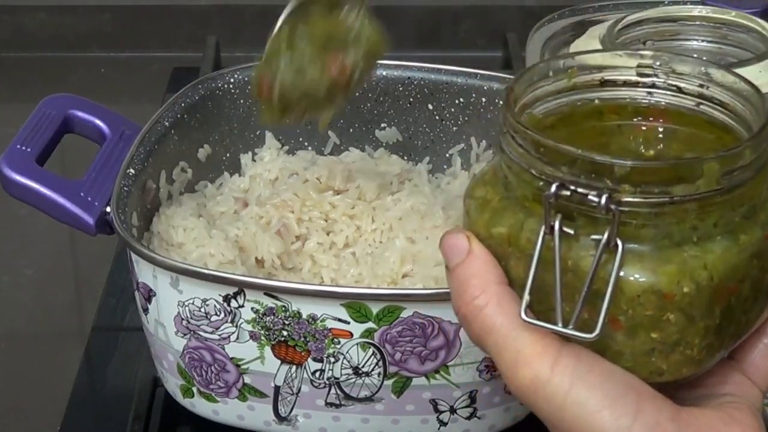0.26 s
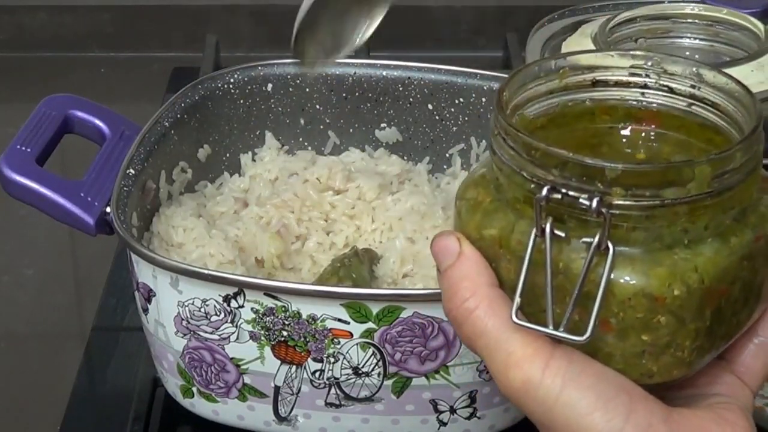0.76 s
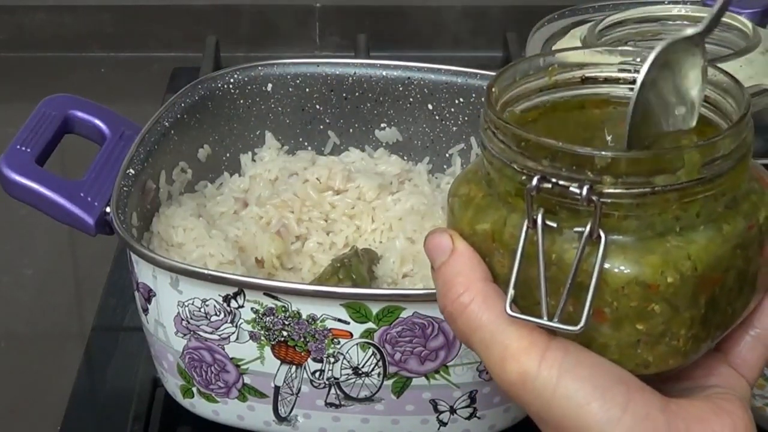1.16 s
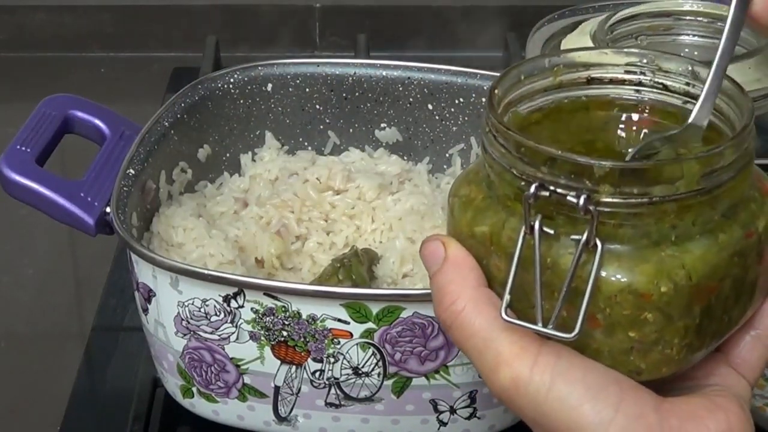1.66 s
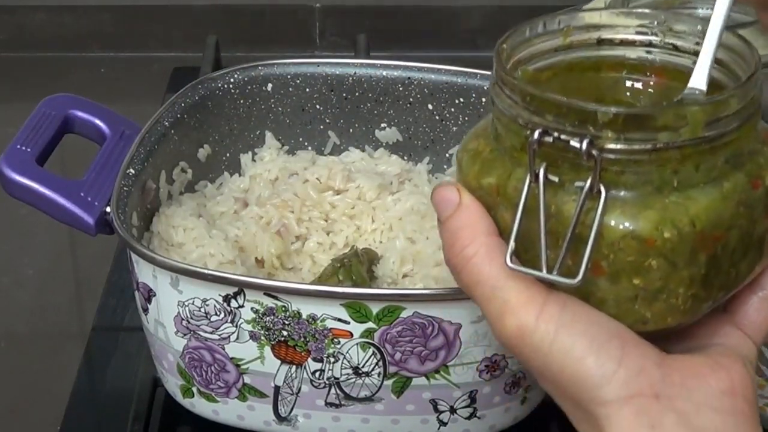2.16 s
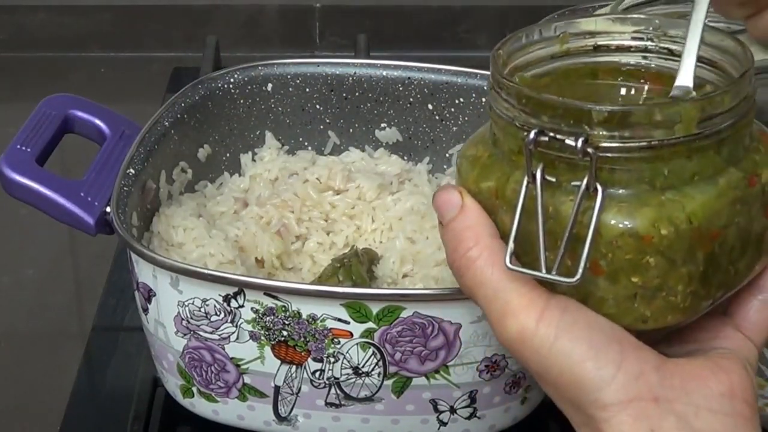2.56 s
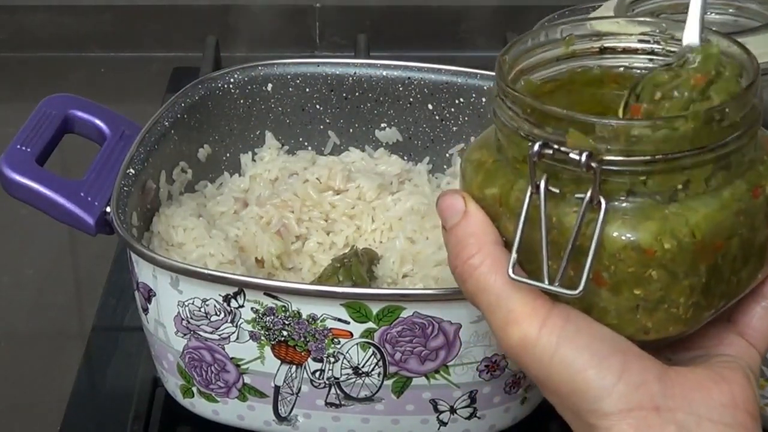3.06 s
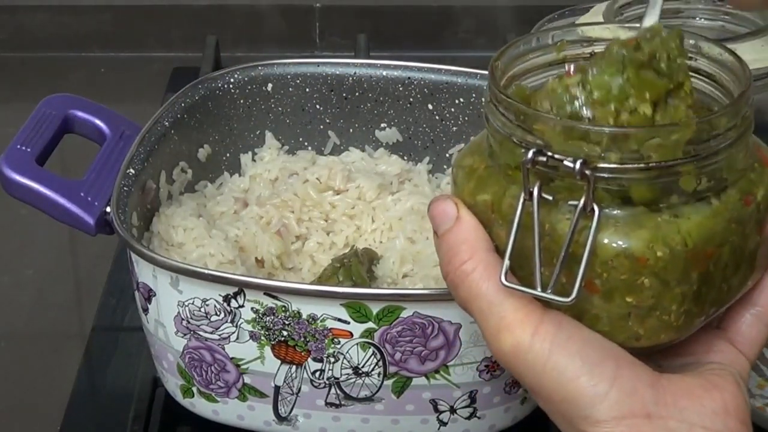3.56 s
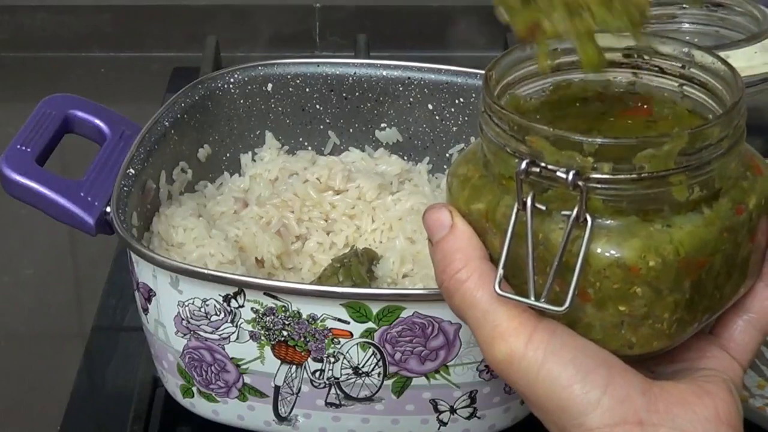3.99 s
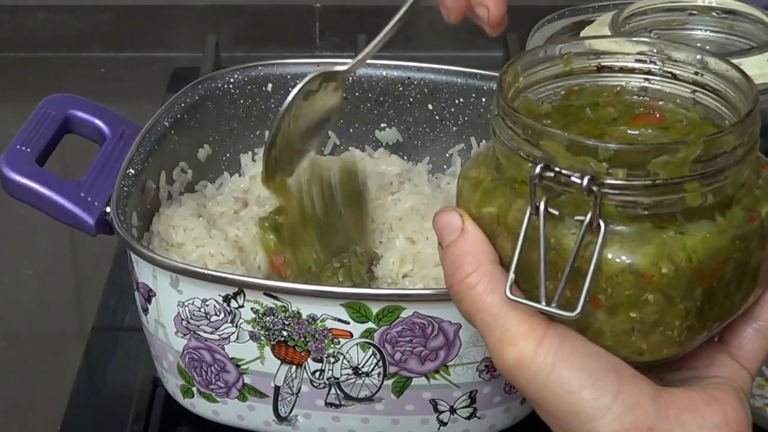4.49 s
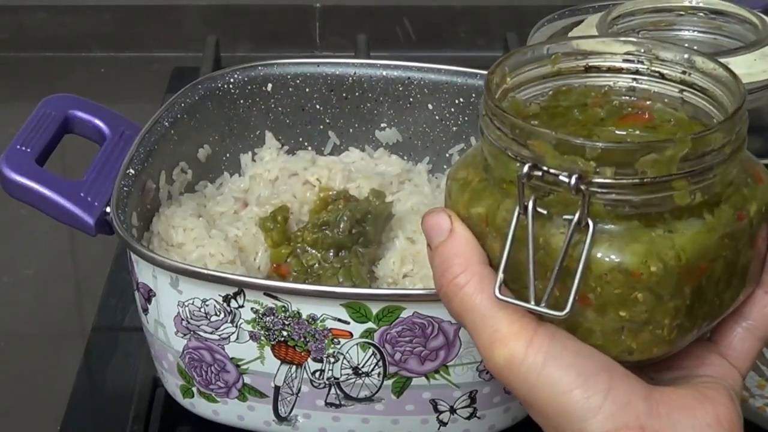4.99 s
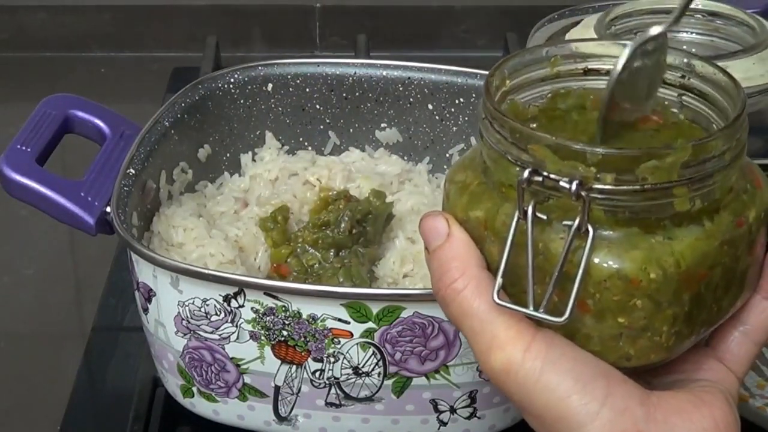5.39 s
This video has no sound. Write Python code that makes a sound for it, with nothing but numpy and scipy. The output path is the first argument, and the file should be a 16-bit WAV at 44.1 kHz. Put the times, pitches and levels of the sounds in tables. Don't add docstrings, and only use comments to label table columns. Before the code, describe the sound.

Close kitchen frying fizzes continuously, with light utensil taps and distant soft knocks, before a metal spoon hits a full jar twice around five seconds.

```python
import sys
import numpy as np
from scipy import signal
from scipy.fft import rfft, irfft
from scipy.io import wavfile
from scipy.ndimage import uniform_filter1d

SR = 44100
rng = np.random.default_rng(int(sys.argv[2]) if len(sys.argv) > 2 else 0)


def makeup_ratio(level_db):
    decades = np.asarray(level_db, float) / 20
    return 10 ** decades


def unload_audio(sound):
    columns = np.transpose(np.atleast_2d(sound))
    steps = np.round(np.clip(columns, -1, 1) * 32767)
    wavfile.write(sys.argv[1], SR, steps.astype(np.int16))


N = 248724
TIME = np.arange(N) / SR

# start [s], fizz level [dB], lean towards larger bubbles [dB].
FRYING = [(0.0, -33.5, -1), (0.3, -35.5, -1.8), (0.6, -34, 1), (0.87, -36, -3.5), (1.12, -36, -0.5),
          (1.3, -32, -0.2), (1.9, -33, -1.5), (2.05, -34, 1.5), (2.25, -33.5, 2.2), (2.75, -35.5, -0.5),
          (3.05, -34.5, 1), (3.95, -34.5, 0), (4.4, -35, -0.5), (4.9, -35, -1), (5.15, -31, 0.5),
          (5.4, -33.5, -5), (5.64, -35, -3.5)]
# centre [Hz], width [Hz], lift [dB].
KITCHEN_MODES = [(200, 25, 6.5), (258, 8.7, 1), (284, 14, 7), (330, 28, 10), (381.6, 37, 4),
                 (705, 90, -1.5), (930, 41, -10.5)]

ROOM_T60_S = 0.29


def unit(x):
    return x / np.sqrt(np.mean(x ** 2))


def walk(rate_hz):
    hold = int(SR / rate_hz)
    levels = np.repeat(rng.standard_normal(N // hold + 1), hold)
    slewed = uniform_filter1d(uniform_filter1d(levels, hold), hold)
    return unit(slewed[:N])


def colour(x, spectrum, modes):
    hz = np.fft.rfftfreq(N, 1 / SR) + 1
    point_hz, point_db = np.transpose(spectrum)
    gain_db = np.interp(np.log(hz), np.log(point_hz), point_db)
    for mode_hz, width_hz, lift_db in modes:
        gain_db = gain_db + lift_db / (1 + (2 * (hz - mode_hz) / width_hz) ** 2)
    return irfft(rfft(x) * makeup_ratio(gain_db), N)


def band(x, hz, width_hz):
    return signal.lfilter(*signal.iirpeak(min(hz, .45 * SR), hz / width_hz, fs=SR), x)


def curve(table):
    s, *columns = np.transpose(table)
    return [np.interp(TIME, s, column) for column in columns]


def rings(rows, rise_s):
    out, t = np.zeros(N + SR), TIME[:SR // 2]
    push = np.sin(np.pi / 2 * np.minimum(t / rise_s, 1)) ** 2
    for s, peak_db, hz, t60_s in rows:
        ring = makeup_ratio(peak_db - 60 * t / t60_s) * np.sin(2 * np.pi * hz * t)
        out[int(s * SR):][:len(t)] += ring * push
    return out[:N]


def room(x, t60_s, wet_db):
    # frequency [Hz], level [dB].
    capsule_difference = [(40, -29), (110, -13), (200, -12), (380, -12), (700, -5.5), (1290, -11),
                          (2380, -11.5), (4400, -8), (8100, -12), (11000, -13), (13000, -16)]
    t = TIME[:int(SR * .6)]
    tails = rng.standard_normal((2, len(t))) * makeup_ratio(-60 * t / t60_s) * (t > .002)
    tails = tails / np.sqrt(np.sum(tails ** 2, axis=1, keepdims=True))
    wet, side = signal.fftconvolve(x[None], tails, axes=1)[:, :N]
    side = colour(side, capsule_difference, [])
    return x + makeup_ratio(wet_db) * wet + side * np.array([[1], [-1]])


def bubbles(low_hz, drift_db, per_s, scatter_db, surge_db, own_db, surge_hz):
    out = 0
    surge = surge_db * walk(surge_hz) + surge_db * walk(6 * surge_hz)
    for k, drift in enumerate(drift_db):
        hz = low_hz * 2 ** (k / 3)
        strength = makeup_ratio(scatter_db * np.minimum(rng.exponential(size=N), 6))
        bursts = (rng.random(N) < per_s / SR) * rng.standard_normal(N) * strength
        ring = unit(band(band(bursts, hz, hz / 4), hz, hz / 4))
        out = out + makeup_ratio(surge + drift + own_db * walk(25.3)) * ring * np.sqrt(hz)
    return out


def vigour():
    # start [s], lift [dB].
    flares = np.array([(.04, 1), (.43, 0), (.52, -1), (.89, 4), (1.67, 1.5), (2.81, -0.5), (3.1, 2),
                       (3.42, -1), (4.04, 0), (4.22, -1), (4.25, 2), (4.45, 2.5), (4.5, -1), (4.58, 0.5),
                       (4.7, 1), (5.12, -2), (5.25, 2), (5.43, 2.5)])
    rise_s, fall_s = 0.0066, 0.22
    age = np.maximum(TIME - flares[:, :1], 0)
    lift_db = flares[:, 1:] * np.minimum(age / rise_s, 1) * np.exp(-age / fall_s)
    return curve(FRYING)[0] + lift_db.sum(axis=0)


def pan():
    # frequency [Hz], level [dB per Hz].
    fizz_colour = [(2500, -11), (4000, -12), (4700, -17), (5900, -7), (7500, -2), (8000, -3.5), (9200, 1.5),
                   (9600, -2.5), (11200, -2.5), (12200, -13), (13600, -10), (14000, -15.5), (15700, -19)]
    # frequency [Hz], level [dB per Hz].
    under_colour = [(290, -35), (500, -6), (886, -9.5), (1130, -4), (1450, -7), (1920, -4.5), (2420, -4.5),
                    (4680, -8.5), (5500, -3), (7150, -3.5), (12100, -120)]
    # centre [Hz], width [Hz], lift [dB].
    lid_modes = [(1140, 216, 4), (1614, 128, 10.5), (1920, 240, 2), (1996, 210, 6), (3010, 230, 3),
                 (3270, 13, 9), (4180, 41, 7), (6770, 110, 3), (6910, 60, 6), (8590, 80, 1), (7950, 105, 5),
                 (8300, 160, 6), (8640, 130, 4.5), (8900, 120, 5.5)]
    # t60 [s], level [dB].
    lid_echo = (.25, -14)
    large_follows, fine_follows, under_follows = 1, 0.67, 0.18
    under_db = -44

    fizz_db = vigour()
    change_db = fizz_db - fizz_db.mean()
    large_db = (large_follows - 1) * change_db + curve(FRYING)[1]
    fine_db = (fine_follows - 1) * change_db
    sizes_db = [large_db, large_db, large_db, 0, 0, fine_db, fine_db]
    fizz = bubbles(3927, sizes_db, per_s=20000, scatter_db=2.1, surge_db=0.55, own_db=.65, surge_hz=18)
    under = bubbles(560, [0] * 11, per_s=5000, scatter_db=1.8, surge_db=.5, own_db=.6, surge_hz=14)
    fizz = unit(colour(fizz, fizz_colour, lid_modes)) * makeup_ratio(fizz_db + 0.47)
    under = unit(colour(under, under_colour, lid_modes)) * makeup_ratio(under_db + under_follows * change_db)
    return room(fizz, *lid_echo) + room(under, 0.12, -8)


def appliances():
    # frequency [Hz], level [dB per Hz].
    flame_colour = [(88, -42), (150, -8.5), (232, -13), (269, -1.5), (328, -6), (422, -5.5), (544, -6),
                    (593, -7), (1200, -7.5), (1560, -34), (2640, -120)]
    # frequency [Hz], level [dB per Hz].
    deep_colour = [(15, -28), (26, -6), (38, -12), (48, -1), (60, -3.5), (85, -8), (130, -2), (170, -11.5),
                   (230, -5.5), (400, -45)]
    # start [s], hum level [dB].
    fridge_load = [
        (0.0, -73),
        (0.28, -67),
        (1.93, -65.5),
        (2.05, -81),
        (2.68, -78),
        (2.87, -67),
        (3.64, -71),
        (5.64, -69.5),
    ]
    flame_db, deep_db, deep_swell_db, fridge_hz = -51, -64, 4.5, 93.5
    deep_follows = .3

    flutter_db = .7 * walk(14) + .6 * walk(3)
    flame = unit(colour(rng.standard_normal(N), flame_colour, KITCHEN_MODES)) * makeup_ratio(flame_db + flutter_db)
    load_db = curve(fridge_load)[0]
    deep_db = deep_db + deep_follows * (load_db - load_db.mean()) + deep_swell_db * walk(2.63)
    deep = unit(colour(rng.standard_normal(N), deep_colour, [])) * makeup_ratio(deep_db)
    hum_hz, waver_db = fridge_hz * (1 + .008 * walk(4)), 1.2 * walk(5)
    hum = np.sqrt(2) * makeup_ratio(load_db + waver_db + 1.5) * np.sin(2 * np.pi * np.cumsum(hum_hz) / SR)
    return flame + deep + hum


def ticks():
    # start [s], peak [dB], ring [Hz], upper mode [Hz], upper mode minus ring [dB].
    contacts = [(0.2108, -36, 2100, 4100, -15), (0.278, -29, 1980, 3850, -1), (0.6397, -37, 1920, 2860, 7),
                (0.8803, -27, 1760, 2950, -30), (0.995, -22.5, 1690, 3010, -22),
                (1.1412, -31, 1150, 3270, 1), (1.29, -29, 2000, 3200, -1), (1.819, -26.5, 1920, 2400, 1.5),
                (2.0163, -29.5, 1790, 3660, -8), (2.0952, -22.5, 1700, 3160, -25),
                (2.3305, -28, 2080, 3700, -5), (2.4247, -32, 2130, 3440, 1), (2.4727, -30, 1900, 3680, -7),
                (2.908, -32, 1600, 2240, -5), (3.1086, -27, 2060, 3010, -6), (3.1957, -28, 1910, 1110, -1),
                (4.248, -28.5, 1640, 3750, -13), (4.547, -24, 1830, 2120, -5), (4.681, -34, 900, 1400, 1),
                (0.299, -33, 3300, 4340, 0), (3.23, -31, 1630, 3300, -4)]
    # start [s], peak
    # [dB], frequency [Hz].
    spits = [(0.052, -21, 8040), (0.1685, -19, 7940), (0.4344, -21, 9100), (0.522, -18, 9100),
             (1.29, -31, 4300), (2.8185, -19, 8600), (3.107, -27, 8490), (3.197, -24, 6400),
             (3.5209, -25, 9830), (4.2203, -21, 8300), (4.2495, -17, 8700), (5.441, -20, 8400)]
    ring_t60_s, upper_t60_s, spit_t60_s = 0.016, 0.014, 0.01
    light = [(s, peak_db - 0.5, hz, ring_t60_s) for s, peak_db, hz, _, _ in contacts]
    light += [(s, peak_db + upper_db, hz, upper_t60_s) for s, peak_db, _, hz, upper_db in contacts]
    spitting = [(*row, spit_t60_s) for row in spits]
    return rings(light, rise_s=.0015) + rings(spitting, rise_s=.0004)


def knocks():
    # start [s], peak [dB], lowest [Hz], highest [Hz], tail t60 [s].
    blows = [(0.201, -44, 151, 231, 0.9), (.2, -35.5, 396, 4470, 0.82), (.893, -32, 198, 705, 0.36),
             (.99, -39, 216, 350, 0.18), (2.094, -41.5, 218, 413, 0.93), (2.096, -32, 400, 2000, .08),
             (2.339, -38.5, 258, 406, 0.19), (2.335, -50, 1780, 2300, .3), (2.875, -39, 1480, 1740, 0.34),
             (5.426, -37, 1400, 3200, 0.47), (3.07, -42, 449, 3480, 0.97), (3.129, -37, 254, 372, 0.18),
             (4.023, -32.5, 503, 1140, 0.43), (4.061, -35.5, 486, 1020, 0.65),
             (4.027, -33.5, 54.4, 488, 0.34), (4.549, -40, 506, 800, 0.21), (4.678, -31.5, 300, 1400, 0.11),
             (5.25, -32, 610, 1110, 0.55), (5.254, -40.5, 230, 400, 0.3)]
    # start [s], peak [dB], frequency [Hz], t60 [s].
    panels = [(.893, -39.5, 530, 0.09), (.893, -41, 610, 0.069), (.896, -45, 362, 0.39),
              (.9, -47, 341, 0.24), (2.094, -36.5, 282, 0.11), (4.023, -33, 950, 0.071),
              (4.024, -38, 899, 0.37), (4.024, -45, 1098, 0.21), (4.025, -42, 706, 0.51),
              (4.05, -42, 575, 0.31), (4.034, -39.5, 364, 0.16), (4.034, -48, 421, 0.31),
              (4.036, -48, 186, 0.16), (5.2503, -32, 960, 0.015), (5.253, -35, 926, 0.098),
              (5.253, -41, 700, 0.24)]
    out = 0
    for s, peak_db, low_hz, high_hz, t60_s in blows:
        age = np.maximum(TIME - s, 0)
        decay = makeup_ratio(-60 * age / t60_s) + .6 * makeup_ratio(-60 * age / .05)
        fade = np.minimum(age / .003, 1) * decay
        body = signal.butter(3, (low_hz, high_hz), "band", fs=SR, output="sos")
        out = out + makeup_ratio(peak_db - 9.5) * fade * unit(signal.sosfilt(body, rng.standard_normal(N)))
    return colour(out, [(20, -4.0), (20000, 4.5)], KITCHEN_MODES) + rings(panels, rise_s=0.00092)


def strikes():
    # start [s], peak [dB], crack [dB].
    hits = [
        (5.2512, -8.5, -7),
        (5.2555, -25, -8),
        (5.4257, -12, -10),
        (5.4295, -22, -17),
    ]
    # frequency [Hz], level [dB], t60 [s].
    jar_modes = [(1400, -15, 0.0084), (1790, 1.5, 0.0069), (1900, -23, .08), (2060, 2.5, 0.0062),
                 (2045, -22, 0.083), (2460, -6, 0.005), (3100, -2, 0.005), (3700, -3, 0.0045)]
    # frequency [Hz], level [dB], t60 [s].
    crack_modes = [(6870, -9.5, 0.034), (7800, 7.5, 0.0042), (8630, -10, .006), (10400, -4, .006),
                   (12500, -9, 0.0066)]
    hard, crack = [], []
    for s, peak_db, crack_db in hits:
        start_s = s - .0004
        hard += [(start_s, peak_db + mode_db - 6.5, hz, t60_s) for hz, mode_db, t60_s in jar_modes]
        crack += [(start_s, peak_db + crack_db + mode_db, hz, t60_s) for hz, mode_db, t60_s in crack_modes]
    return rings(hard, rise_s=.0007) + rings(crack, rise_s=.0004)


def scene():
    spoon = room(ticks(), ROOM_T60_S, -2.5) + room(strikes(), ROOM_T60_S, -8)
    far = room(knocks(), 0.33, -11) + room(appliances(), .1, -20)
    pan_side_db, rest_side_db = np.array([[-.3], [.3]]), np.array([[.2], [-.2]])
    return pan() * makeup_ratio(pan_side_db) + (spoon + far) * makeup_ratio(rest_side_db)


def top_cut(x):
    return signal.sosfilt(signal.butter(12, 16520, fs=SR, output="sos"), x)


def record(dry):
    # frequency [Hz], peak [dB].
    whistle = [(15625, -66)]
    dry = dry + sum(makeup_ratio(peak_db) * np.sin(2 * np.pi * hz * TIME) for hz, peak_db in whistle)
    low_pass = signal.ellip(12, .3, 75, 15720, fs=SR, output="sos")
    return top_cut(signal.sosfilt(low_pass, dry))


dry = scene()
out = record(dry)
unload_audio(out)
```